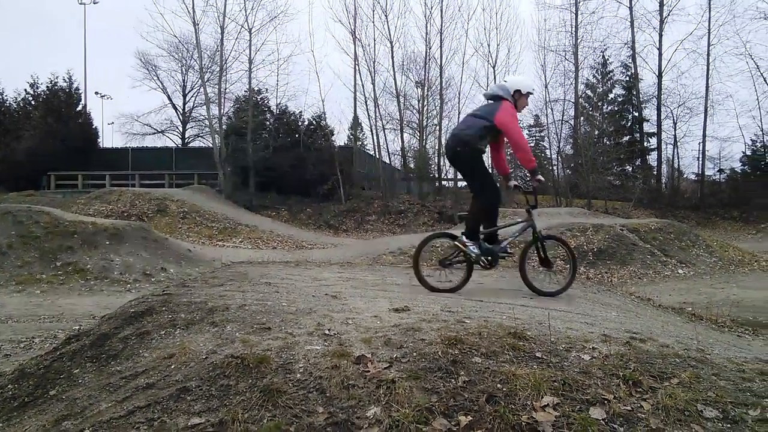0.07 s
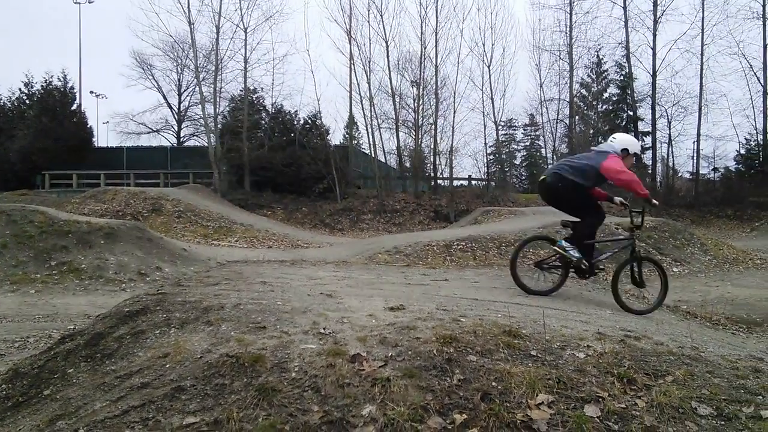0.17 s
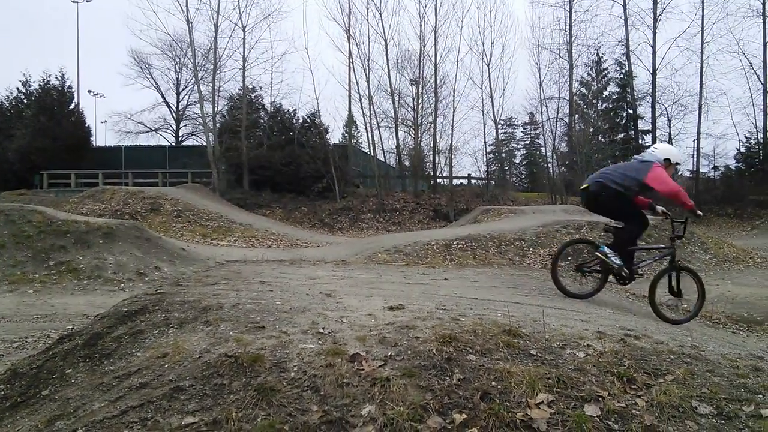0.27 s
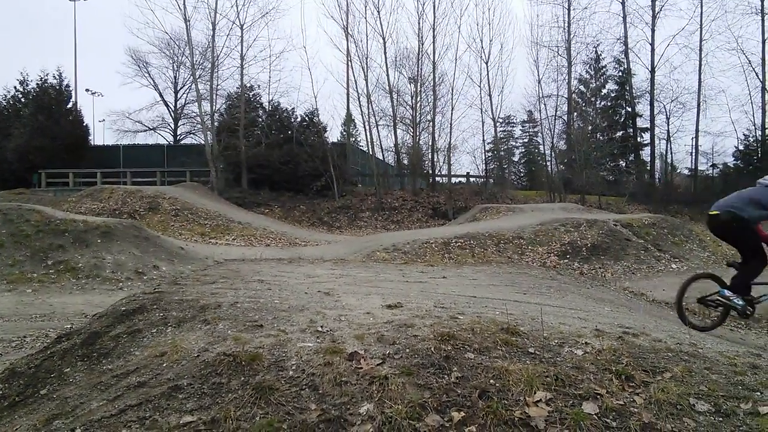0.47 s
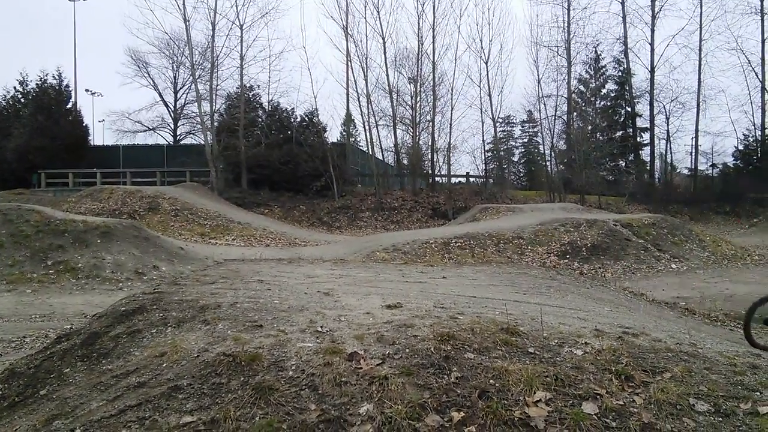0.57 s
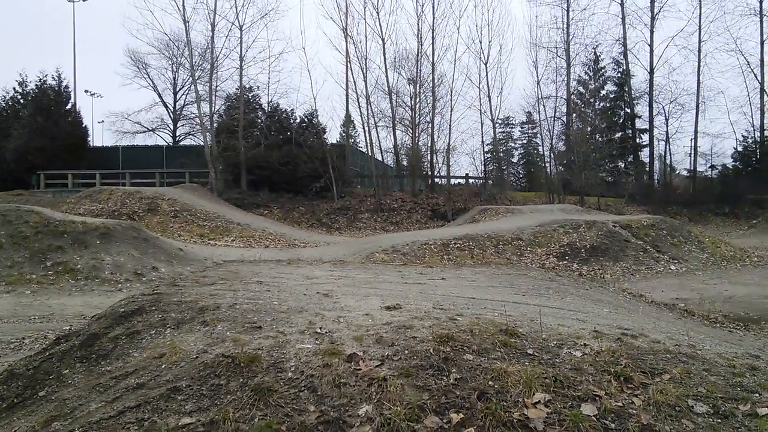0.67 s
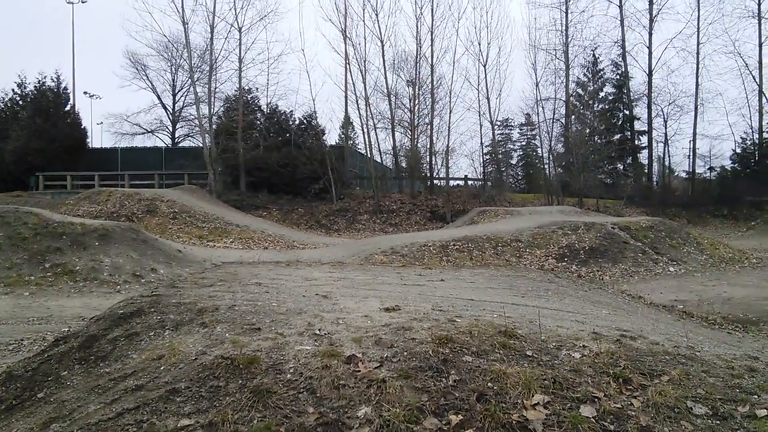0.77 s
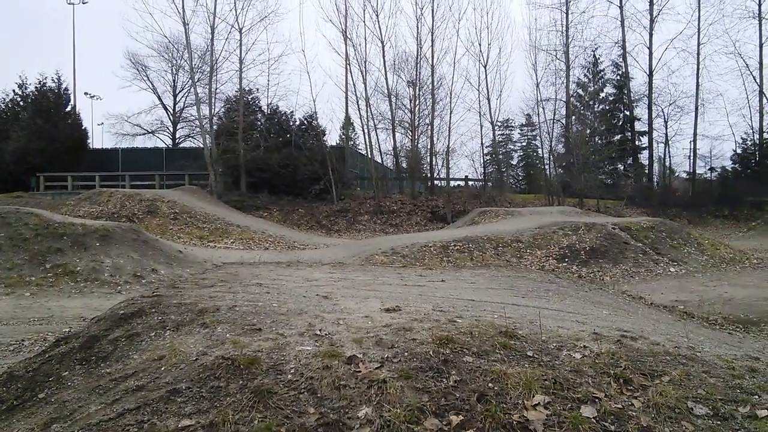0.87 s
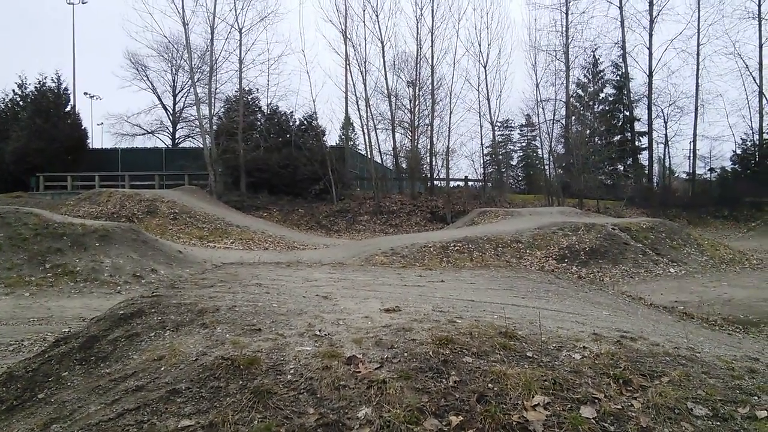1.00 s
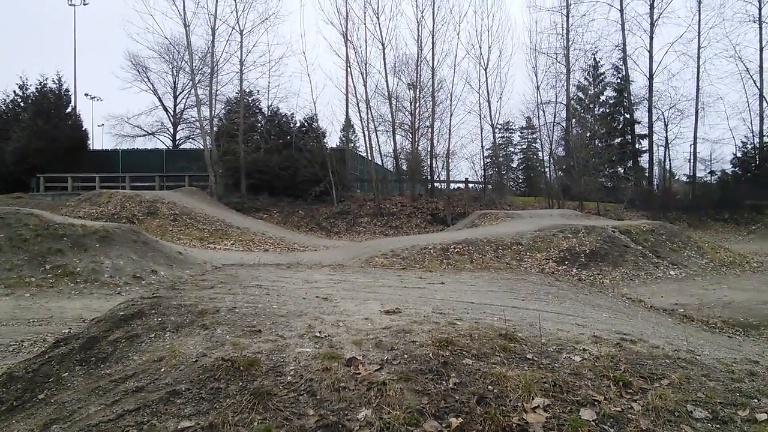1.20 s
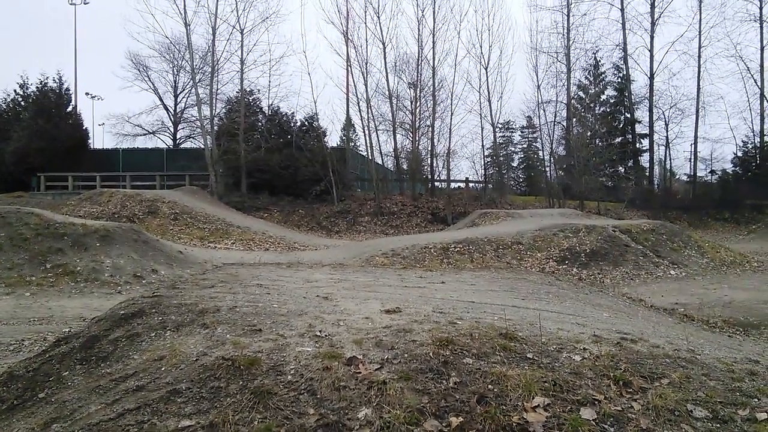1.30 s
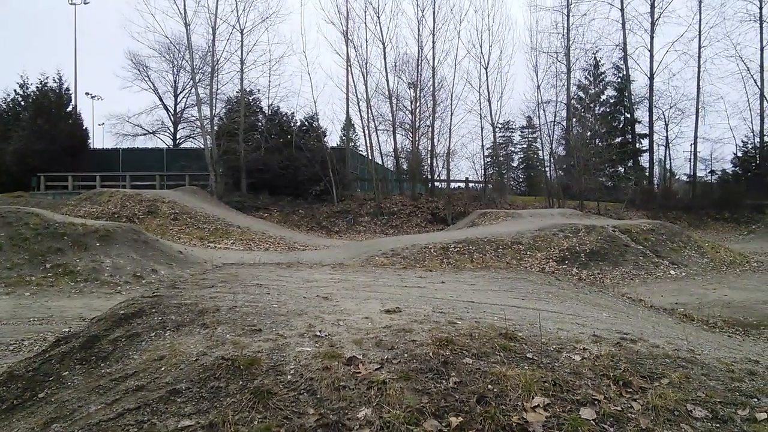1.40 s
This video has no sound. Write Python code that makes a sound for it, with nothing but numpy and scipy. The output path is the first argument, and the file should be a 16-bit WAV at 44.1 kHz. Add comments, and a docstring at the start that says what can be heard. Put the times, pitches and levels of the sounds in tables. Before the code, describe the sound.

Bicycle landing on an outdoor dirt track: brief soft freewheel whirr, a quick double thud with chain slaps and a hard metallic clink, then gritty tyre hiss with pebble clicks, fading into quiet distant hum.

```python
"""A small bicycle freewheels through the air, lands on packed dirt and rolls away.
Coloured noise makes the whirr, the ticking pawls, the tyre thuds and the chain slaps;
dense tiny clicks make the crunch and the rolling grit; decaying sines ring the steel part
(one hard clink, then faint jingles) and the pebbles. A distant hum and hiss lies behind."""
import sys
import numpy as np
from scipy import signal
from scipy.fft import rfft, irfft
from scipy.io import wavfile
from scipy.ndimage import uniform_filter1d

SR = 44100
rng = np.random.default_rng(int(sys.argv[2]) if len(sys.argv) > 2 else 0)


def to_wav(s):
    """Save 16-bit WAV."""
    ch = np.atleast_2d(s).T  # columns
    pcm = np.round(np.clip(ch, -1, 1) * 32767)  # PCM
    wavfile.write(sys.argv[1], SR, pcm.astype(np.int16))


N = 63945

# Colour of coarse grit, under the tyres and scattered by pebbles: f/Hz, level/dB (per Hz)
GRIT_COLOUR = [(200, -27), (700, -16.5), (1350, -11), (1750, -3.5), (2300, -0.5), (2700, -5), (3600, -5.5),
               (4600, -14.5), (7000, -34), (16000, -34)]


def undb(db):
    """Decibels to gain."""
    return 10 ** (np.asarray(db) / 20)


def unit(x):
    """Scale to an rms of 1."""
    return x / np.sqrt(np.mean(x ** 2))


def colour(x, points):
    """Causal minimum-phase filter through (f/Hz, level/dB) points; the result has an rms of 1."""
    hz, db = np.array(points).T
    grid = np.maximum(np.fft.rfftfreq(2 * N, 1 / SR), 1)
    log_gain = np.log(undb(np.interp(np.log(grid), np.log(hz), db)))
    # folding the cepstrum onto positive times makes the filter causal
    cepstrum = irfft(log_gain)
    response = np.exp(rfft(2 * cepstrum[:N], 2 * N))
    return unit(irfft(rfft(x, 2 * N) * response)[:N])


def noise(points):
    """Smooth noise of a given colour."""
    return colour(rng.standard_normal(N), points)


def grains(points, per_s, spread_db):
    """Dense tiny clicks of uneven size and random sign, in a given colour."""
    size = undb(spread_db * np.minimum(rng.exponential(size=N), 2 * np.pi))
    sign = np.sign(rng.standard_normal(N))
    present = rng.random(N) < per_s / SR
    return colour(size * sign * present, points)


def walk(rate):
    """Slow random wander with an rms of 1, drawing about rate new values a second."""
    hold = max(int(SR / rate), 1)
    steps = rng.standard_normal(N)[np.arange(N) // hold]
    return unit(uniform_filter1d(steps, hold))


def fade(t, t60, attack):
    """Linear attack from t = 0, then an exponential decay of 60 dB in t60 seconds."""
    age = np.maximum(t, 0)
    return np.minimum(age / attack, 1) * np.exp(-np.log(1000) * age / t60)


def curve(t, rows, axis=1):
    """Gain along a table of times and levels; axis picks the level column."""
    rows = np.array(rows)
    return undb(np.interp(t, rows[:, 0], rows[:, axis]))


def distant_air():
    """Distant outdoor hum and hiss: coloured noise whose level wanders slightly."""
    # Colour of the hum and hiss: f/Hz, level/dB (per Hz)
    air_colour = [(25, -19), (55, -1), (70, -19), (88, 3.5), (120, -4.5), (200, -7.5), (400, -10),
                  (600, -3), (800, 0.5), (1250, -13), (2200, -14.5), (3000, -19.5), (3800, -31),
                  (5600, -26), (7500, -20.5), (15500, -21)]
    level_db = -57.5 + 0.28 * walk(6.1)
    return undb(level_db) * noise(air_colour)


def freewheel(t):
    """In the air the pawls tick at a steady rate and the spinning wheels whirr in one swell."""
    # Colour of the pawl ticks: f/Hz, level/dB (per Hz)
    pawl_colour = [(3000, -25), (5000, -4), (7000, 8), (11000, 10), (16000, 1)]
    # Colour of the wheel whirr: f/Hz, level/dB (per Hz)
    whirr_colour = [(900, -11), (1600, -5.5), (2080, 4.5), (2400, -7), (2900, -6.5), (3700, -32),
                    (6000, -58)]
    pawl_hz, start_s, end_s, pawl_t60_s = 81.6, 0.1, 0.23, 0.012
    whirr_peak_s, whirr_width_s, whirr_db = 0.12, 0.047, -57.5

    since_tick = (t - start_s) % (1 / pawl_hz)
    ticking = (t > start_s) * (t < end_s)
    ticks = fade(since_tick, pawl_t60_s, attack=0.0004) * ticking
    pawls = undb(-52 + 1.4 * walk(58)) * ticks * noise(pawl_colour)

    swell = np.exp(-((t - whirr_peak_s) / whirr_width_s) ** 2)
    return pawls + undb(whirr_db) * swell * noise(whirr_colour)


def rolling(t):
    """The tyres grind coarse and fine grit, fling sand and drone on the packed dirt."""
    # Course of the rolling: t/s, coarse grit level/dB, fine grit level/dB, sand spray level/dB
    roll_levels = [(0.185, -90, -93, -92), (0.21, -46.5, -54, -52), (0.29, -47.5, -49, -47),
                   (0.328, -42.5, -41.5, -47.5), (0.37, -45, -44.5, -51.5), (0.48, -48, -48, -56.5),
                   (0.56, -47, -46, -69), (0.595, -52, -47, -56), (0.615, -46.5, -50.5, -72),
                   (0.745, -46, -46, -48), (0.79, -42.5, -58, -53), (0.85, -50, -55.5, -52.5),
                   (0.905, -51, -59, -54), (0.93, -49.5, -58, -45), (0.99, -51.5, -53.5, -53.5),
                   (1.04, -50, -51, -49), (1.12, -54.5, -55, -54.5), (1.27, -62, -54, -67),
                   (1.355, -56, -52.5, -59), (1.45, -59.5, -59.5, -64.5)]
    # Course of the hollow tyre drone: t/s, level/dB
    drone_levels = [(0.19, -95), (0.22, -62.5), (0.48, -55.5), (0.6, -60), (0.8, -56), (0.9, -64),
                    (1.1, -64.5), (1.45, -64.5)]
    # Colour of fine grit: f/Hz, level/dB (per Hz)
    fine_colour = [(1500, -22.5), (2500, 1), (3300, 0.5), (4500, 1.5), (5900, -1), (7200, -8), (12000, -14)]
    # Colour of sand spray: f/Hz, level/dB (per Hz)
    spray_colour = [(3000, -31), (6000, -1), (8500, 2), (11000, 0.5), (15500, -3)]
    # Colour of the hollow tyres: f/Hz, level/dB (per Hz)
    tyre_colour = [(40, -15), (90, -1), (160, -14), (250, 1.5), (430, -6), (650, -0.5), (850, 2),
                   (1200, -12), (2500, -21), (6000, -43)]
    grains_per_s, spread_db = 8000, 2.5

    coarse = grains(GRIT_COLOUR, grains_per_s, spread_db) * curve(t, roll_levels, axis=1)
    fine = grains(fine_colour, grains_per_s, spread_db) * curve(t, roll_levels, axis=2)
    spray = grains(spray_colour, per_s=14000, spread_db=3.0) * curve(t, roll_levels, axis=3)
    # one flicker, in dB, moves grit and sand together
    patches = undb(1.49 * walk(110))
    drone = noise(tyre_colour) * curve(t, drone_levels) * undb(2.0 * walk(29.9))
    return patches * (coarse + fine + spray) + drone


def bumps(t):
    """Ruts in the track knock the hollow tyres: short bursts of noise peaked at one pitch."""
    # Knocks: t/s, level/dB, pitch f/Hz
    knocks = [(0.469, -48.5, 235), (0.585, -55, 249), (0.643, -41, 744), (0.711, -52.5, 770),
              (0.816, -51.5, 656)]
    t60_s, attack_s = 0.11, 0.0032
    skirt_db = -63  # an octave either side of the pitch
    out = 0
    for start_s, db, hz in knocks:
        hollow = noise([(hz / 2, skirt_db), (hz, 0), (hz * 2, skirt_db)])
        out = out + undb(db) * fade(t - start_s, t60_s, attack_s) * hollow
    return out


def pebbles(t):
    """A stone squeezed from under a tyre cracks free, rings for a moment and scatters grit; one small tick amid
    the rolling grit sounds the same way."""
    # Pebbles: t/s, ring level/dB, pitch f/Hz, crack level/dB; the row at 0.7855 s is a small tick within the
    # rolling grit, sounded the same way
    stones = [(0.408, -23, 2200, -44), (0.4602, -32, 4330, -35), (0.5238, -28, 3800, -40.5),
              (0.5652, -23, 3000, -43), (0.573, -28.5, 3650, -40), (0.6056, -22.5, 3250, -36.5),
              (0.6208, -34, 3900, -39), (0.746, -19, 2250, -29.5), (0.7855, -31, 2300, -48),
              (0.9377, -21.5, 2460, -32), (1.0298, -29.5, 4220, -42)]
    # Modes of a pebble: frequency ratio to its pitch, level/dB
    stone_modes = [(.8, -8), (1, 0.5), (1.27, -3.5), (2.1, -15)]
    # Colour of the crack: f/Hz, level/dB (per Hz)
    crack_colour = [(1500, -22), (3500, 5), (6000, 2.5), (9000, 2), (16000, -6.5)]
    ring_t60_s, ring_attack_s = 0.0072, 0.001
    tail_db, tail_t60_s = -15, 0.043  # the tail level is relative to the ring level

    out, crack, scatter = 0, noise(crack_colour), noise(GRIT_COLOUR)
    for start_s, db, hz, crack_db in stones:
        age = t - start_s
        ring = 0
        for ratio, mode_db in stone_modes:
            phase = 2 * np.pi * (ratio * hz * age + rng.random())
            ring = ring + undb(mode_db) * np.sin(phase)
        ring = ring * fade(age, ring_t60_s, ring_attack_s)
        # the grit starts just ahead of the ring
        tail = undb(tail_db) * scatter * fade(age + 0.0023, tail_t60_s, attack=0.00096)
        snap = undb(crack_db) * crack * fade(age, t60=0.0097, attack=0.000074)
        out = out + undb(db) * (ring + tail) + snap
    return out


def chain(t):
    """Many links strike at once in short bright slaps of noise."""
    # Slaps: t/s, level/dB, t60/s
    slaps = [(0.1868, -38.5, 0.035), (0.1897, -38.5, .02), (0.204, -26, .018), (0.2124, -19.5, 0.027),
             (0.2246, -32, 0.022), (0.2315, -28.5, .018), (0.2519, -18, 0.017)]
    # Colour of the chain: f/Hz, level/dB (per Hz)
    chain_colour = [(1000, -22), (3500, -12), (5200, -4.5), (7000, -5.5), (9500, -7.5), (11000, -1.5),
                    (12300, -9), (14500, 0), (16000, -11)]
    strikes = sum(undb(db) * fade(t - start_s, t60, attack=0.0003) for start_s, db, t60 in slaps)
    return noise(chain_colour) * strikes


def steel(t):
    """A loose steel part rings in its modes until it settles back, leaving a faint after-ring."""
    # Clinks: t/s, level/dB, softness of the contact (attack)/s, tilt/(dB per octave)
    clinks = [(0.2532, -12, 0.00013, -1), (0.552, -45, .001, -15), (0.636, -40, .001, -14),
              (0.673, -39, 0.00046, 1), (0.7265, -37, 0.00024, 4), (0.828, -58, .001, -15)]
    # Modes of the steel part: f/Hz, level/dB, t60/s
    steel_modes = [(7607, -7, .068), (7810, -3, .017), (8420, -2.5, .053), (8525, -6, .035),
                   (8700, 0, .014), (9270, -8, .016), (10160, -12, .05), (11190, -20, .04),
                   (13330, -13, .033), (13780, -4, .014), (15565, -8, .027)]
    seat_s, seat_fade_s = 0.017, 0.0018  # free ringing time, then time constant of the muting
    after_db, after_t60_s = -22.5, 0.31  # after-ring; this t60 is the first mode's, others scale
    first_hz, _, first_t60 = steel_modes[0]

    out = 0
    for start_s, db, soft_s, tilt_db in clinks:
        age = t - start_s
        free = np.exp(-np.maximum(age - seat_s, 0) / seat_fade_s)
        for hz, mode_db, t60 in steel_modes:
            gain = undb(db + mode_db + tilt_db * np.log2(hz / first_hz))
            tone = np.sin(2 * np.pi * (hz * age + rng.random()))
            after = undb(after_db) * fade(age, after_t60_s * t60 / first_t60, soft_s)
            out = out + gain * tone * (free * fade(age, t60, soft_s) + after)
    return out


def landing(t):
    """Each blow on the dirt thuds in the tyre and crushes a burst of grit."""
    # Tyre blows: t/s, thud level/dB, crunch level/dB, crunch t60/s
    blows = [(0.197, -35.5, -32, 0.13), (0.2115, -35.5, -28, 0.074), (0.2224, -64, -31.5, 0.02),
             (0.241, -60, -36, 0.066), (0.253, -44, -23.5, 0.04), (0.267, -49.5, -34.5, 0.035)]
    # Colour of the thud: f/Hz, level/dB (per Hz)
    thud_colour = [(30, -11), (70, -19), (130, -11), (220, -6), (380, -11), (540, 4.5), (800, -3.5),
                   (1200, -5.5), (2000, -21), (5000, -55)]
    # Colour of the crunch: f/Hz, level/dB (per Hz)
    crunch_colour = [(300, -37), (900, -11.5), (1700, -7), (2300, 0.5), (3300, -5.5), (5000, 0.5),
                     (7000, -11), (10000, -9), (16000, -21)]
    attack_s, thud_t60_s = 0.00041, 0.097

    thud = noise(thud_colour)
    crunch = grains(crunch_colour, per_s=4000, spread_db=1.1)
    out = 0
    for start_s, thud_db, crunch_db, crunch_t60 in blows:
        age = t - start_s
        out = out + undb(thud_db) * thud * fade(age, thud_t60_s, attack_s)
        out = out + undb(crunch_db) * crunch * fade(age, crunch_t60, attack_s)
    return out


def scene():
    """The bicycle over the distant hum, as one channel."""
    t = np.arange(N) / SR
    background = distant_air()
    ride = freewheel(t) + rolling(t) + bumps(t) + pebbles(t)
    impact = chain(t) + steel(t) + landing(t)
    return (background + ride + impact)[None]


def record(dry):
    """The recorder thins the deep bass and cuts the top steeply."""
    low_hz, top_hz = 41.7, 15750
    bass_cut = signal.butter(2, low_hz, "high", fs=SR, output="sos")
    top_cut = signal.ellip(10, 0.2, 70, top_hz, fs=SR, output="sos")  # ripple dB, stopband dB
    return signal.sosfilt(top_cut, signal.sosfilt(bass_cut, dry))


dry = scene()
out = record(dry)
to_wav(out)
```